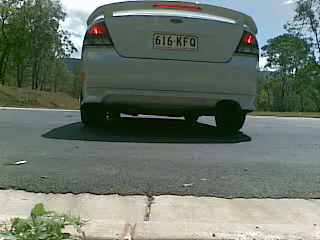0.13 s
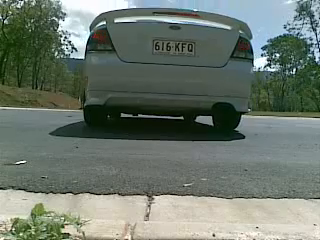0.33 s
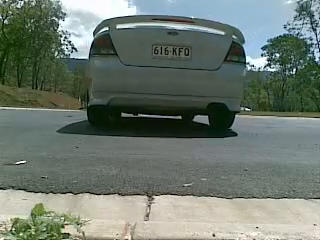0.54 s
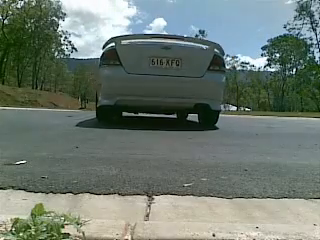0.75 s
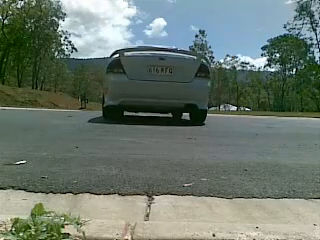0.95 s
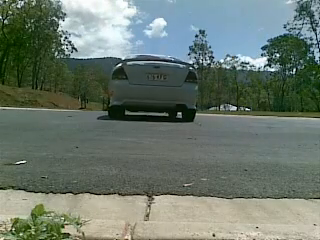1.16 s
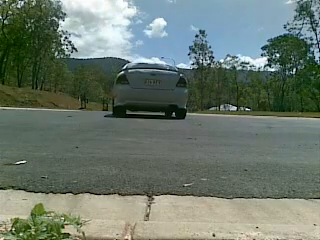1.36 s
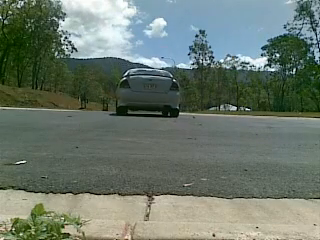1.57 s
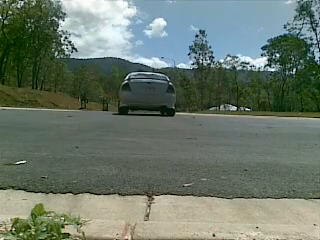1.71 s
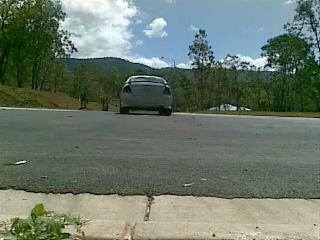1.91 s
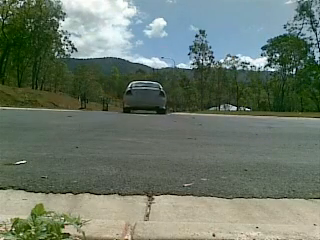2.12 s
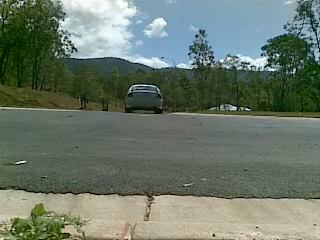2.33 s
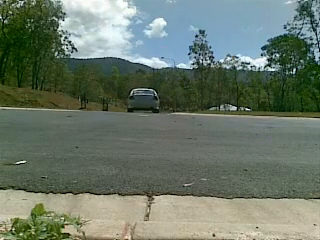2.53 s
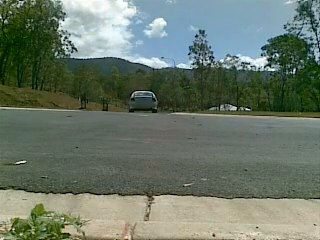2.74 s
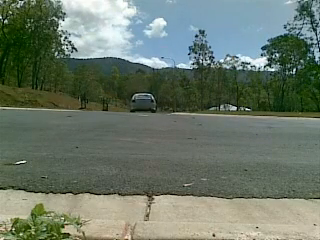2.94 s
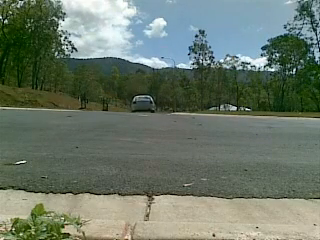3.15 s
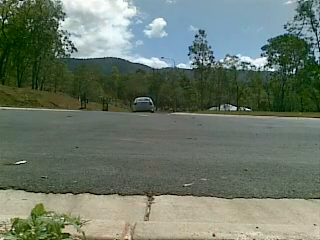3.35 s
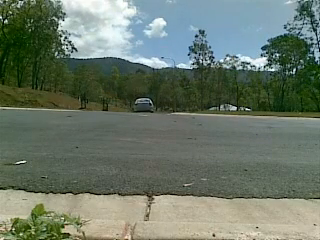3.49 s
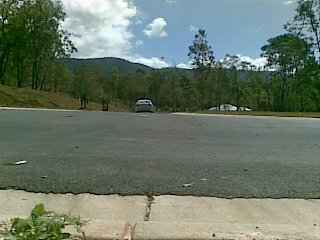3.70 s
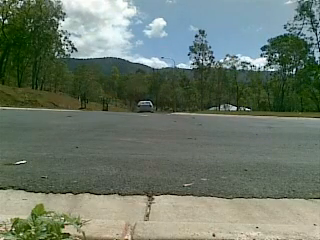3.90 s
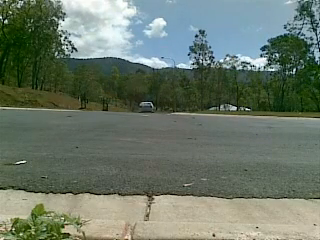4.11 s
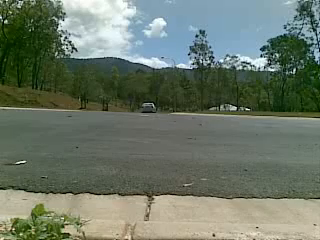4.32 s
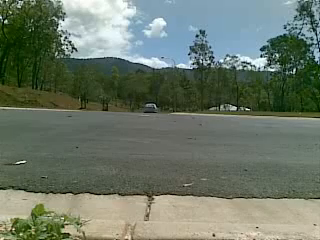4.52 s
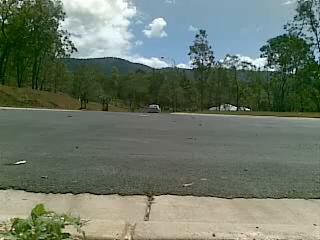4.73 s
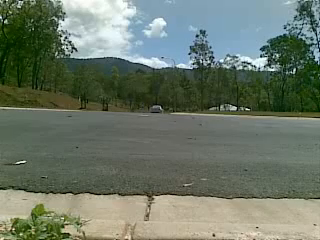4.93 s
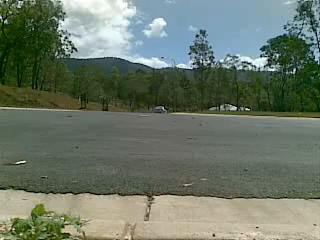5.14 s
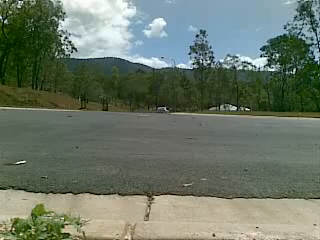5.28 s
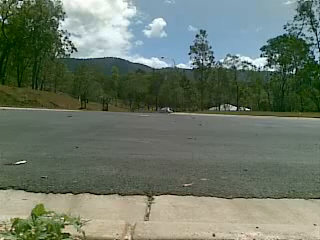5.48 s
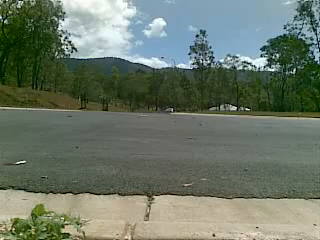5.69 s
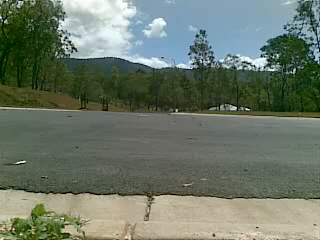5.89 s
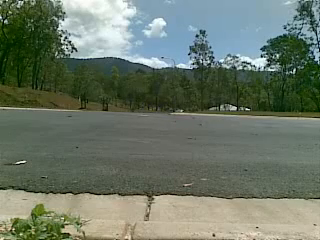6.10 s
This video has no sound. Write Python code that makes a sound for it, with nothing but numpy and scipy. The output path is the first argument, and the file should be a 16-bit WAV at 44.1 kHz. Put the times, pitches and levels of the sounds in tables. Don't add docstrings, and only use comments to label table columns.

```python
import sys
import numpy as np
from scipy import signal
from scipy.fft import rfft, irfft
from scipy.io import wavfile
from scipy.ndimage import uniform_filter1d, map_coordinates

SR = 44100
rng = np.random.default_rng(int(sys.argv[2]) if len(sys.argv) > 2 else 0)


def put_to_file(sound):
    columns = np.atleast_2d(sound).T
    safe = np.clip(columns, -1, 1)
    whole_steps = np.round(safe * 32767)
    wavfile.write(sys.argv[1], SR, whole_steps.astype(np.int16))


def boost_factor(decibels):
    exponent = np.asarray(decibels, float) / 20
    return 10 ** exponent


N = 271215
T = np.arange(N) / SR
SHUT_S, SHUT_FALL_S, SHUT_DB = 4.36, 0.13, -4.5


def noise():
    return rng.standard_normal(N)


def unit(x):
    return x / np.sqrt(np.mean(x ** 2) + 1e-20)


def curves(rows):
    s, *cols = np.transpose(rows)
    return [np.interp(T, s, c) for c in cols]


def during(rows, fade_s=0.048):
    inside_s = np.minimum(T - rows[0][0], rows[-1][0] - T)
    return np.clip(1 + inside_s / fade_s, 0, 1)


def bump(x, centre, span):
    return np.exp(-((x - centre) / span) ** 2)


def after(s, span_s):
    return np.clip((T - s) / span_s, 0, 1)


def wobble(rate_hz):
    coarse = T[::64]
    knots = rng.standard_normal(int(N * rate_hz / SR) + 4)
    return np.interp(T, coarse, map_coordinates(knots, [coarse * rate_hz]))


def colour(x, points):
    m = 2 ** 15
    hz, db = np.transpose(points)
    grid_hz = np.fft.rfftfreq(m, 1 / SR)
    gain = boost_factor(np.interp(np.log(grid_hz + 1), np.log(hz + 1), db))
    cep = irfft(np.log(gain + 1e-6), m)
    cep[1:m // 2] *= 2
    cep[m // 2 + 1:] = 0
    impulse = irfft(np.exp(rfft(cep)), m)[:m // 2]
    return signal.fftconvolve(x, impulse)[:N]


def rush(points, patchy_db):
    z = signal.stft(noise(), nperseg=512)[2]
    field = uniform_filter1d(uniform_filter1d(rng.standard_normal(z.shape), 6, 0), 10, 1)
    patchy = signal.istft(z * boost_factor(patchy_db * unit(field)), nperseg=512)[1][:N]
    return unit(colour(patchy, points))


# time_s, firing_rate_hz, effort_db
REVS = [(0, 44, -51.5), (.09, 35.7, -40), (.19, 46.8, -31.5), (.265, 60.3, -32), (.315, 74, -32),
        (.38, 79.2, -32), (.47, 86.6, -33.5), (.59, 94.6, -33), (.7, 99.3, -35), (.91, 103.4, -37),
        (1.31, 105.3, -43), (1.6, 115.2, -43), (2.23, 134.5, -40), (2.86, 161, -39), (3.42, 185, -38.5),
        (4.34, 226.5, -35.5), (4.46, 212, -48.5), (4.6, 216, -63.5)]


def firings():
    strong_s = .8058
    count = np.cumsum(curves(REVS)[0]) / SR
    return count - count[round(strong_s * SR)] + 60


def running():
    lope = np.interp(T, [.3, .86, 1.55], [.5, 1, 0])
    least, top, from_s = .12, .72, 2.3
    launch = .42 * bump(T, 0, .62)
    rough = least + launch + (top - least) * after(from_s, SHUT_S - from_s)
    return lope, np.clip(rough, 0, 1)


ORDERS = [1, 1 / 2, 2 / 3, 4 / 3, 3 / 2, 2, 5 / 2, 3]
# over_effort_db, extra_when_loping_db
ORDER_DB = [(0.5, -0.5), (-21, 0), (-25, -6), (-16, 4.5), (-11.5, 4.5), (-3.5, -1.5), (-10, 0), (-3.5, -8)]
# centre_hz, width_octaves, gain_db
BOOMS = [(57.3, 0.34, 7.5), (115.7, 0.46, 5.5), (150.6, 0.17, 4.5), (185.5, 0.045, -2.5), (245, 0.17, -2),
         (336, 0.23, 5), (529, 0.16, 6), (612, .12, -7.5), (703, 0.18, -11)]


def order_levels():
    rate_hz, effort_db = curves(REVS)
    lope = running()[0]
    octaves = np.arange(3, 10, 1 / 64)
    tuning_db = -6 * (octaves - np.log2(106.7))
    for hz, width, db in BOOMS:
        tuning_db = tuning_db + db * bump(octaves, np.log2(hz), width)
    shut_db = SHUT_DB * after(SHUT_S, SHUT_FALL_S)
    cold_db = -9.5 * bump(T, .23, 0.047)
    uneven_db = -7 * (after(.1, 0.056) - after(0.47, .2))
    half_db = uneven_db + 5.5 * bump(T, SHUT_S, 0.12)
    kick_db = 6.5 * bump(T, 0.47, .11)
    levels_db = []
    for k, (over_db, lope_db) in zip(ORDERS, ORDER_DB):
        db = effort_db + over_db + lope_db * lope + np.interp(np.log2(k * rate_hz), octaves, tuning_db)
        db = db + (k != 1) * shut_db + (k >= 2) * cold_db
        levels_db.append(db + (k % 1 == .5) * half_db + (k == 2) * kick_db)
    return levels_db


# low_cycles, high_cycles, centre_hz, span_hz
SLIDES = [
    (-.2, 1.17, 101, 22),
    (.02, 1.17, 118, 20),
    (.08, -.18, 132, 14),
]


def tones(count):
    rate_hz = curves(REVS)[0]
    half, three_half, second = [low + (high - low) * (1 + np.tanh((rate_hz - at) / over)) / 2
                                for low, high, at, over in SLIDES]
    second = second + .6 * (1 - after(.22, .07))
    lag_cycles = [0, half, .2, .25, three_half, second, .03, -.24]
    rough = running()[1]
    turn = count - .3
    levels_db = order_levels()
    settled = after(.3, .15)
    levels_db[2:4] = [db - 40 * (1 - settled) for db in levels_db[2:4]]
    total = 0
    for k, db, lag in zip(ORDERS, levels_db, lag_cycles):
        flutter_db = (0.57 + 2.5 * rough * (k != 1)) * wobble(24.99)
        total = total + boost_factor(db + flutter_db) * np.cos(2 * np.pi * (k * turn - lag))
    return -np.sqrt(2) * during(REVS) * total


def without_tones(x, count):
    for k in ORDERS:
        for wave in (np.cos(2 * np.pi * k * count), np.sin(2 * np.pi * k * count)):
            x = x - 2 * wave * uniform_filter1d(x * wave, SR // 8)
    return x


def steady(x):
    return x / np.sqrt(np.abs(uniform_filter1d(x ** 2, SR // 4)) + 1e-20)


# freq_hz, gain_db
PIPE = [(15, -62), (60, -25), (120, -12.5), (190, -6.5), (250, -4.5), (330, 2), (410, -3.5), (520, -1),
        (650, -1.5), (750, -10.5), (890, -25.5), (1100, -25), (1500, -39.5), (3300, -67)]
LOPING = [1, .17, .24, .17, .18, .32]
PULLING = [1, 1, .55, .5, .75, .9]


def rasp(count):
    bank_lead_s = 0.00045
    lope, rough = running()
    at = np.flatnonzero(np.diff(np.floor(count))) + 1
    cylinder = np.floor(count[at]).astype(int) % 6
    chance = rng.standard_normal((len(at), 2))
    size = lope[at] * np.take(LOPING, cylinder) + (1 - lope[at]) * np.take(PULLING, cylinder)
    arrival = at - bank_lead_s * SR * (cylinder % 2) + (5 + 4 * rough[at]) * chance[:, 0]
    arrival = arrival + .002 * SR * lope[at]
    sample = np.clip(np.round(arrival).astype(int), 0, N - 1)
    pulses = np.bincount(sample, -size * boost_factor(chance[:, 1]), N)
    clean = without_tones(colour(pulses, PIPE), count)
    gas = colour(noise() * np.exp(-1.5 * (count % 1)), PIPE)
    effort_db = curves(REVS)[1]
    level_db = 1.07 * (effort_db + 40) - 40 - 3 - 1.64 * T
    level_db = level_db - 3 * lope - 10 * (T < .17)
    level_db = level_db + 4.5 * bump(T, 1.64, 0.28) + 1.5 * bump(T, 2.67, 0.28)
    level_db = level_db - 4 + SHUT_DB * after(SHUT_S, SHUT_FALL_S) / 2
    mixed = np.sqrt(1 - rough) * steady(clean) + np.sqrt(rough) * steady(gas)
    return boost_factor(level_db) * during(REVS) * mixed


def over_floor(db, floor_db):
    return 20 * np.log10(np.hypot(boost_factor(db), boost_factor(floor_db)))


# time_s, level_db
FLOW = [(0, -70.5), (.07, -71.5), (.09, -60.5), (.2, -51.5), (.31, -56), (.41, -51.5), (.76, -52),
        (1.0, -57.5), (1.23, -62.5), (1.5, -61), (1.75, -61.5), (2.2, -70), (3.25, -65.5), (3.7, -61.5),
        (4.25, -59), (4.5, -65.5), (5.46, -70), (6.15, -77.5)]
# time_s, gain_db
PUFFS = [
    (.085, -4),
    (.24, 2.5),
    (.65, 0.5),
    (0.838, 1.5),
    (1.04, 3),
    (1.29, 3),
    (1.76, 4),
    (3.53, -0.5),
    (4.25, 0),
]
# freq_hz, density_db_per_hz
ROAR_TONE = [(530, -31.5), (900, -1), (966, -10), (1180, -9), (1610, -7), (2080, -4), (2480, -7),
             (3250, -12), (3600, -19), (4200, -24), (5460, -47), (9240, -120)]
# freq_hz, density_db_per_hz
HISS_TONE = [(2120, -50.5), (3600, -5), (3760, -2), (5110, 1.5), (6360, -1), (7180, 1), (8580, -2.5),
             (10500, -5.5), (13600, -34.5), (22000, -120)]
# freq_hz, density_db_per_hz
FIZZ_TONE = [(8500, -41.5), (10500, 1.5), (12500, 1), (14200, -5), (14600, -61.5)]
# freq_hz, density_db_per_hz
TREAD_TONE = [(1700, -34), (2300, -1), (2900, -3.5), (3300, -6), (3700, -21.5), (6000, -57.5)]


def roar(count):
    roar_db, = curves(FLOW)
    puff_db = sum(db * bump(T, s, .035) for s, db in PUFFS) + .8 * wobble(7.6)
    floor_swell_db = 9
    floor_db = -80.5 + 0.097 * floor_swell_db * after(SHUT_S, 0.78)
    floor_fizz_db = -92.5 + floor_swell_db * after(SHUT_S, 0.82)
    hiss_db = over_floor(roar_db - 8.5 - 1.13 * T, floor_db) + puff_db
    fizz_db = over_floor(roar_db - 11.5 - 16.5 * after(0.89, 1), floor_fizz_db) + 1.3 * puff_db
    shared_db = .5 * wobble(11)
    chop = 1 + 0.1 * np.cos(2 * np.pi * count)
    tread_gain = boost_factor(-6) * after(3.02, 1.2) * (1 - after(SHUT_S, 0.54))
    tread = tread_gain * unit(colour(noise(), TREAD_TONE))
    body = boost_factor(roar_db + shared_db - 1.62) * chop * (rush(ROAR_TONE, patchy_db=0.95) + tread)
    hiss = boost_factor(hiss_db + shared_db + 0.17) * rush(HISS_TONE, patchy_db=1.5)
    fizz = boost_factor(fizz_db + shared_db - 2.5) * rush(FIZZ_TONE, patchy_db=3.5)
    return body + hiss + fizz


# time_s, strength_db; the exhaust blast of the launch gives the loud start (about
# 0.05-0.5 s), wind the rest
BREEZE = [(0, -57), (.06, -38.5), (.56, -52), (.95, -53.5), (1.35, -48.5), (1.55, -59), (2.3, -60),
          (3.5, -58), (4.1, -58), (4.4, -63), (4.88, -64.5), (5.15, -59.5), (6.15, -59)]
# freq_hz, density_db_per_hz
BREEZE_TONE = [(5.9, -36.5), (10, 2.5), (64, 0), (166, -7.5), (182, -29.5), (211, -9.5), (245, -38),
               (350, -29.5), (460, -70), (770, -120)]
# centre_s, peak_db, pitch_hz, length_s
GUSTS = [(4.562, -48, 47.5, 0.038), (4.743, -49.5, 60, 0.041), (4.76, -53.5, 134, 0.04),
         (5.0, -45.5, 50.2, 0.04), (5.02, -50, 155, 0.025), (5.18, -40, 68, 0.02),
         (5.271, -34.5, 64.6, 0.021), (5.431, -39, 73.2, 0.023), (5.609, -49.5, 55, 0.072),
         (5.708, -43.5, 65, 0.018), (5.849, -39, 96, 0.015), (5.86, -54, 175, 0.019),
         (5.956, -36.5, 61, 0.019), (6.026, -36, 59.7, 0.026), (6.126, -47, 59, 0.026)]


def wind():
    lumps = unit(boost_factor(2.5 * wobble(9)) * rush(BREEZE_TONE, patchy_db=0.0))
    total = boost_factor(curves(BREEZE)[0] + 8.0) * lumps
    for s, db, hz, span_s in GUSTS:
        envelope = boost_factor(db) * np.exp(-((T - s) / span_s) ** 2 * 2)
        total = total + envelope * np.sin(2 * np.pi * hz * (T - s))
    return total


# start_s, peak_db, spit_db
POPS = [(0.083, -30, -12.5), (0.168, -44, 4), (0.188, -25, -24), (0.208, -28.5, -8.5), (0.25, -38.5, -6),
        (0.299, -22, -27), (0.327, -25, -25), (0.354, -22.5, -32), (0.38, -34, -22), (0.426, -53, -21),
        (0.495, -51.5, -29)]
# freq_hz, gain_db
POP_TONE = [(100, -26), (250, 5.5), (350, -2), (500, 0.5), (700, 5), (900, -11.5), (1300, -37), (3000, -60)]


def pops():
    barks, spit = np.zeros(N), np.zeros(N)
    for s, db, spit_db in POPS:
        barks[round(s * SR)] = -boost_factor(db)
        spit += boost_factor(db + spit_db - 10.5) * (T > s) * np.exp(-np.abs(T - s) / 0.0033)
    return boost_factor(27.5) * colour(barks, POP_TONE) + spit * unit(colour(noise(), HISS_TONE))


def scrub():
    at_s = .72
    level = boost_factor(-60) * bump(T, at_s, .08) + boost_factor(-65) * bump(T, at_s, .33)
    tone = [(1500, -54), (1950, -18), (2090, 0.5), (2230, -11), (2800, -52)]
    return level * rush(tone, patchy_db=3.0)


# start_s, peak_db
GRIT = [
    (1.2882, -57),
    (3.5242, -69),
]
# start_s, peak_db
KNOCK = (5.011, -50)


def grit():
    shape = sum(boost_factor(db - 2) * (T > s) * np.exp(-np.abs(T - s) / .006) for s, db in GRIT)
    tick_tone = [(600, -40), (1600, -7), (2500, -14), (3700, -12), (4200, 0), (4800, -3),
                 (5600, -16), (12000, -35)]
    ticks = shape * unit(colour(noise(), tick_tone))
    blow = -boost_factor(KNOCK[1] + 29) * (np.arange(N) == round(KNOCK[0] * SR))
    knock_tone = [(60, -20), (150, 5), (330, 17.5), (500, 11), (650, 4), (1000, -28), (3000, -62)]
    return ticks + colour(blow, knock_tone)


# freq_hz, density_db_per_hz
FAR_TONE = [(88, -25.5), (150, -4), (283, -14.5), (318, -13.5), (392, -14.5), (450, -9.5), (497, -10.5),
            (637, -15), (761, -14.5), (901, -14.5), (1380, -25), (1600, -23), (2080, -36), (3520, -120)]


def coast():
    start_s, far_s = 4.6, 4.22
    hz = 457.6 - 93 * np.maximum(T - 5.75, 0)
    low_db = -70 + 6 * bump(T, 5.78, .12)
    upper_db = -72 - 10 * after(5.85, 0.086)
    turn = 2 * np.pi * np.cumsum(hz * (1 + .02 * wobble(50))) / SR
    drone = boost_factor(low_db + 4 * wobble(18)) * np.sin(turn)
    drone = drone + boost_factor(upper_db + 4 * wobble(18)) * np.sin(turn * 1.23)
    road = boost_factor(-55 - 5 * (T - far_s)) * after(far_s - .3, 0.42) * rush(FAR_TONE, patchy_db=1)
    return np.sqrt(2) * after(start_s - .05, .05) * drone + road


def scene():
    count = firings()
    car = tones(count) + rasp(count) + roar(count)
    return (car + wind() + pops() + scrub() + grit() + coast())[None]


# freq_hz, step_over_local_level_db
COARSE = [(2500, -18), (3500, -3), (5000, 0), (8000, 4.5), (10000, 6), (12000, 7.5), (14000, 9)]
# freq_hz, step_db
FLOOR_STEP = [(3000, -120), (8000, -92), (10000, -84), (11500, -80), (14000, -78)]


def thin_treble(x):
    size, shift = 1024, 1024 - 172
    count = N // size + 2
    n, k = np.arange(2 * size), np.arange(112, 688)
    window = signal.windows.kaiser_bessel_derived(2 * size, 4 * np.pi)
    cosines = np.cos(np.pi / size * np.outer(n + .5 + size / 2, k + .5))
    basis = np.sqrt(2 / size) * window[:, None] * cosines
    padded = np.pad(x, (size + shift, 3 * size))
    lines = padded[np.arange(count + 1)[:, None] * size + n] @ basis
    power = uniform_filter1d(uniform_filter1d(lines ** 2, size=33, axis=1), size=3, axis=0)
    level = np.sqrt(np.abs(power))
    line_hz = k * SR / 2 / size
    coarse = boost_factor(np.interp(line_hz, *np.transpose(COARSE)))
    least = boost_factor(np.interp(line_hz, *np.transpose(FLOOR_STEP)))
    mood = boost_factor(2.5 * rng.standard_normal((count + 1, len(k) // 16))).repeat(16, axis=1)
    step = mood * np.hypot(level * coarse, least) + 1e-9
    rounded = np.sign(lines) * np.floor(np.abs(lines) / step + .4) * step
    error = (rounded - lines) @ basis.T
    lapped = (error[:-1, size:] + error[1:, :size]).ravel()
    return x + lapped[shift:shift + N]


def low_pass(x):
    return signal.sosfilt(signal.butter(12, 14280, fs=SR, output="sos"), x)


def record(dry):
    mix = thin_treble(dry[0])[None]
    return low_pass(mix)


dry = scene()
out = record(dry)
put_to_file(out)
```